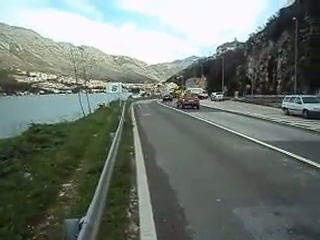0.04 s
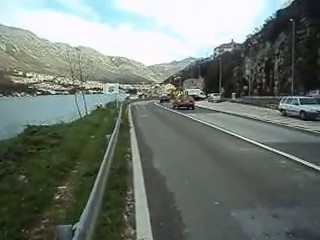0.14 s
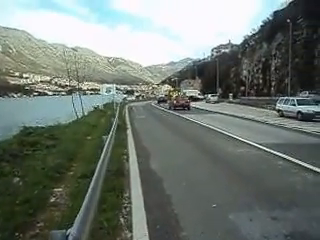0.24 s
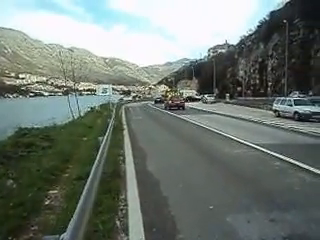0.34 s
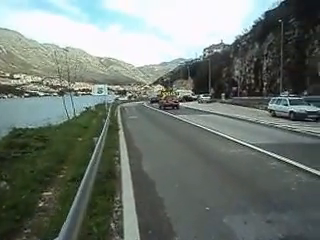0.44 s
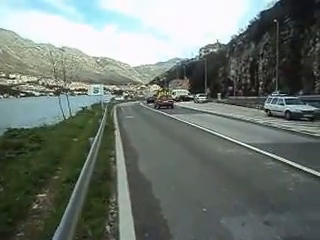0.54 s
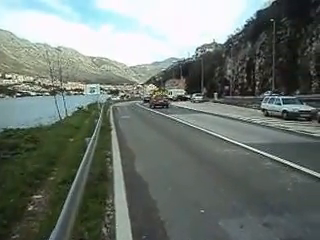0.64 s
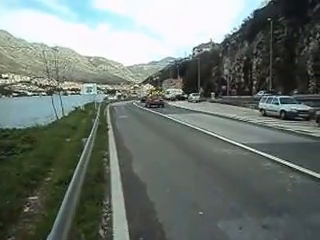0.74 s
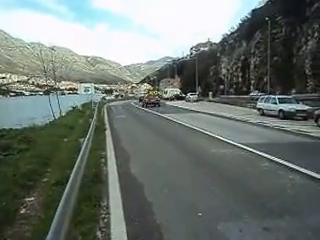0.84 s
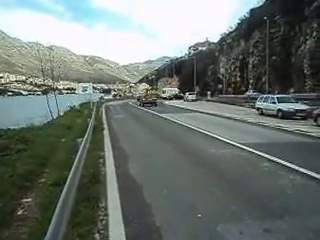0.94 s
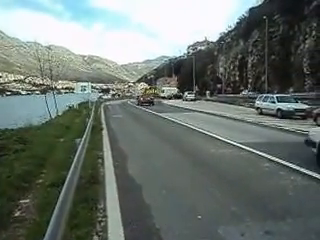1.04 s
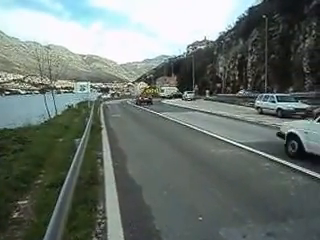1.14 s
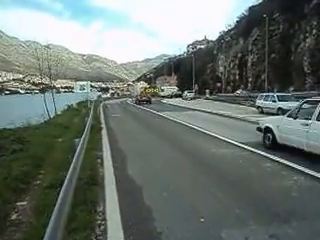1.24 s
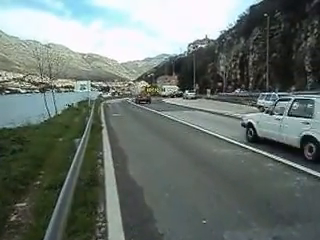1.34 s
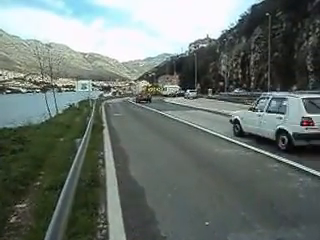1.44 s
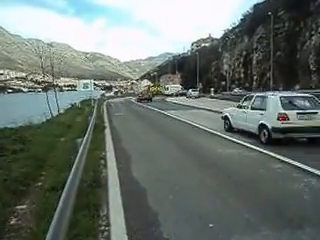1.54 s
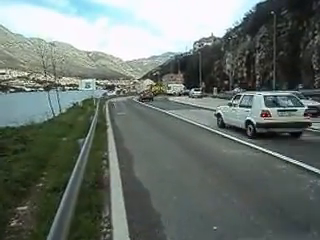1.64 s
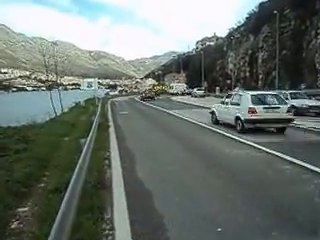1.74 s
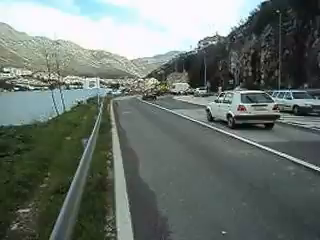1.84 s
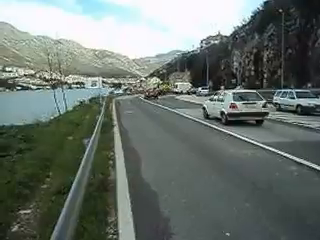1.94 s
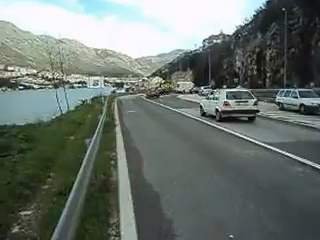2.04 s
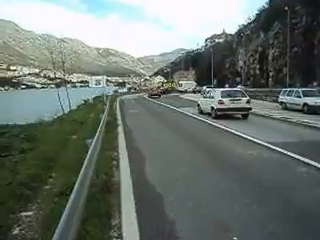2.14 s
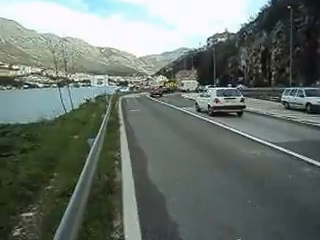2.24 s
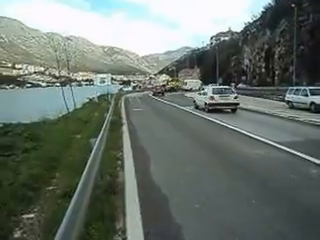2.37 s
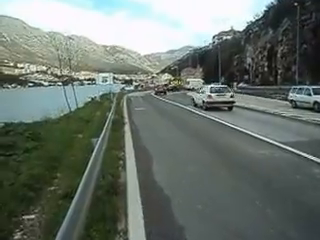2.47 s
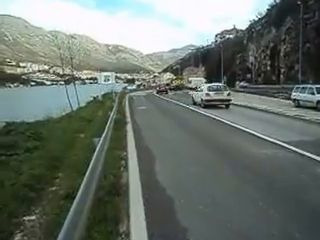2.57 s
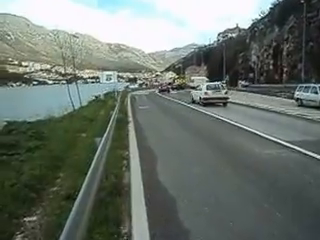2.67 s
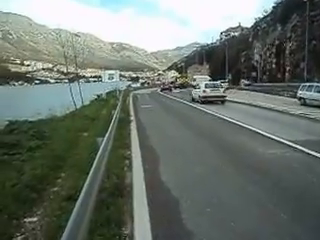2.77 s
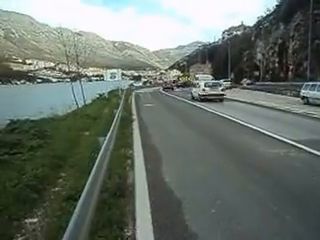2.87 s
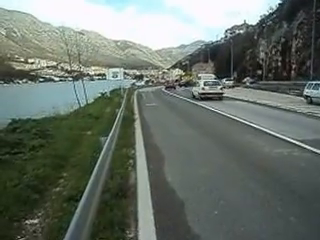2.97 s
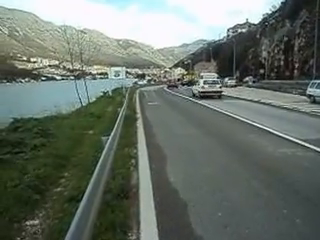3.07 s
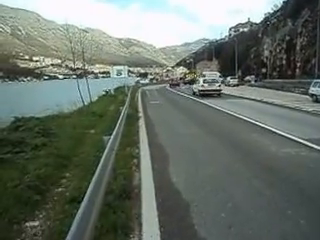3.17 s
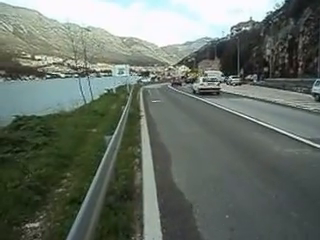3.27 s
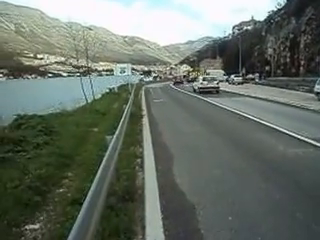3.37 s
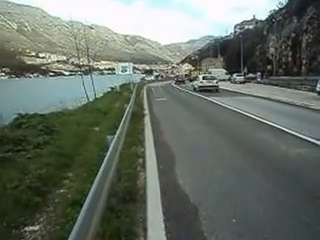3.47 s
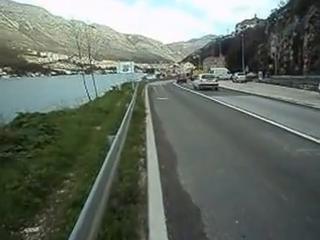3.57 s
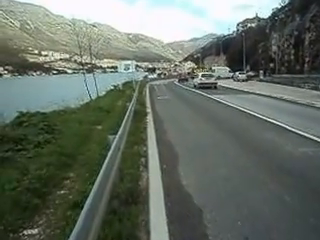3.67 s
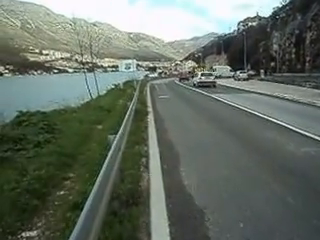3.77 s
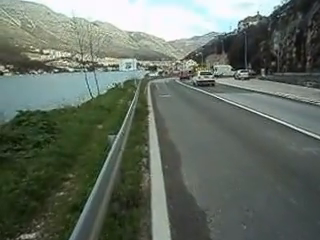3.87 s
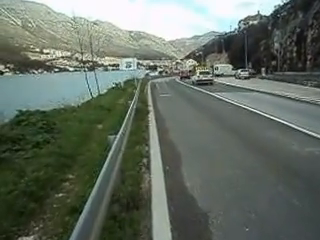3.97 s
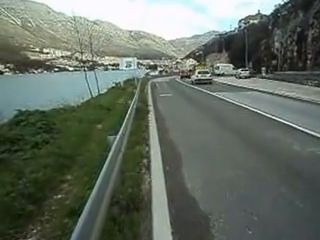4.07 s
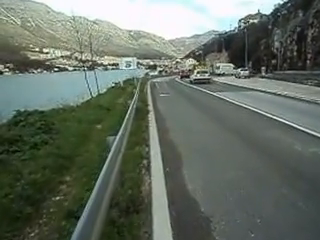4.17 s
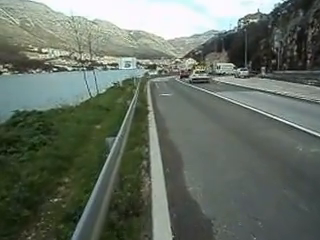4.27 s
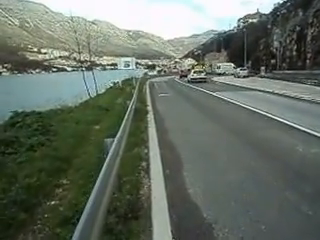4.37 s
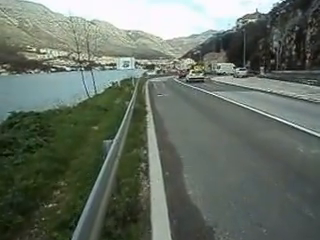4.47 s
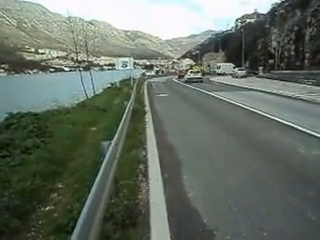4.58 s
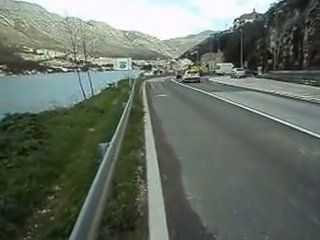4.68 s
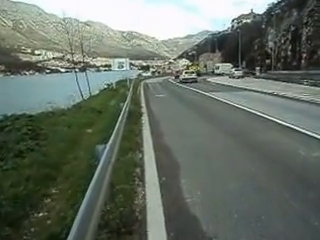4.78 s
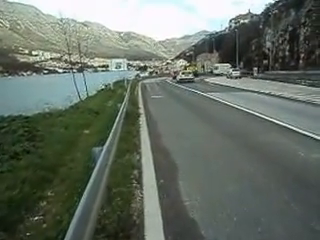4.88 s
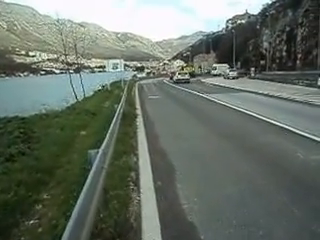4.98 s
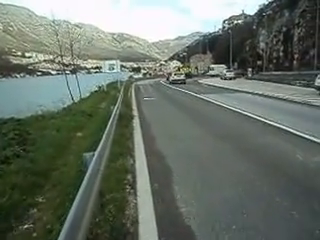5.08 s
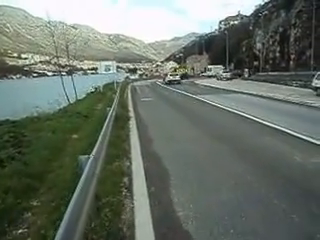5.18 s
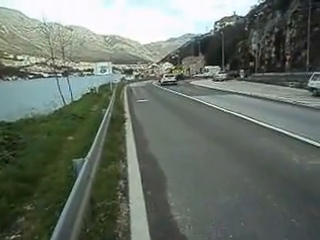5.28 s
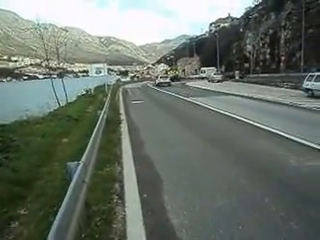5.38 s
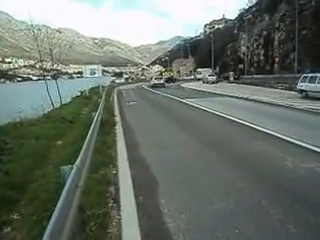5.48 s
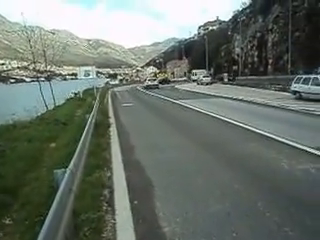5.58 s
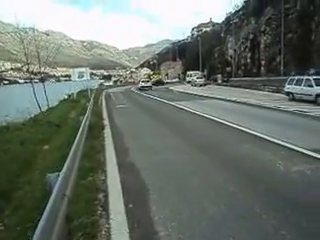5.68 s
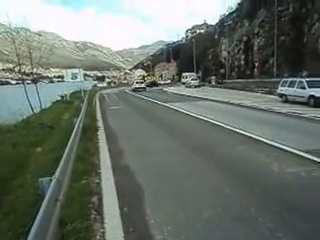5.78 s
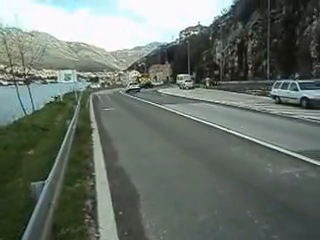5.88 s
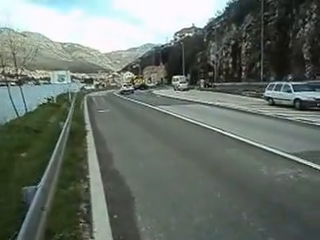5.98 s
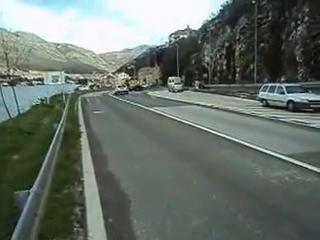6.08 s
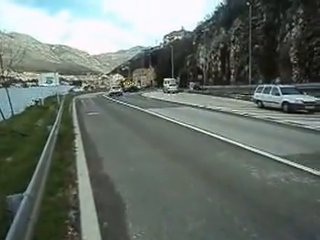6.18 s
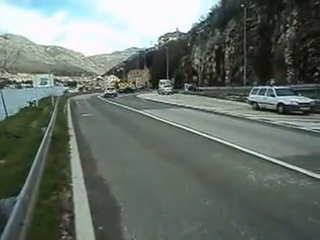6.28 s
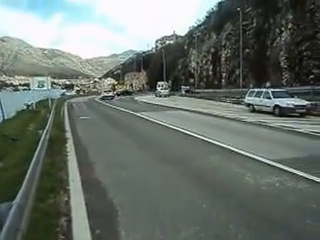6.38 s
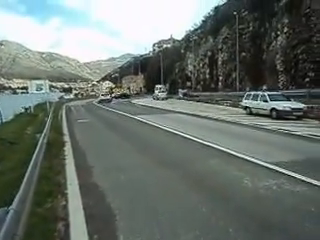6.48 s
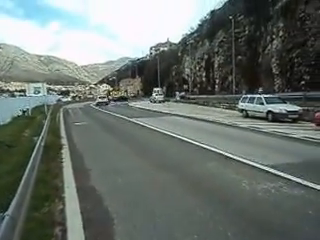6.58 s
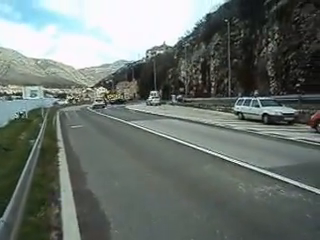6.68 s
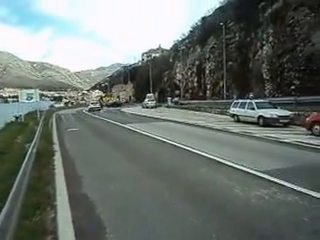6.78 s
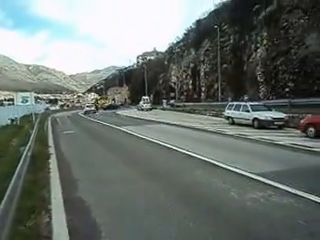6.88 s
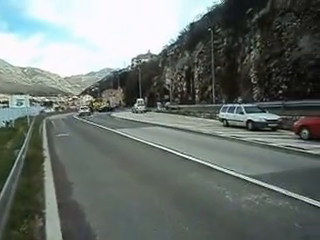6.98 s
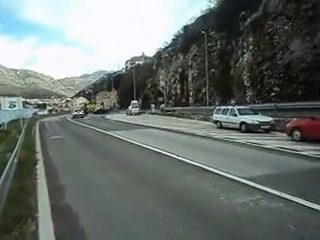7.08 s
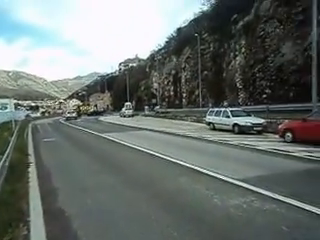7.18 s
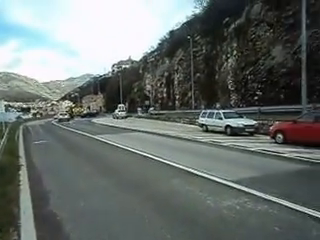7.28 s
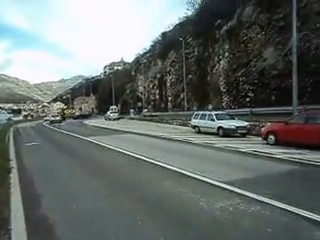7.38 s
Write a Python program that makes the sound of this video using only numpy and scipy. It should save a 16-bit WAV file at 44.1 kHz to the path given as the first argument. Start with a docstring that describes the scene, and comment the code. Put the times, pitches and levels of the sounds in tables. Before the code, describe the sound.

A steady wash of distant traffic and low, far engine tones runs throughout, heard from the verge of an open road. A small diesel car approaches at once and passes close at about 1 second, its tyres singing and roaring over a low exhaust boom. It then coasts away, its engine note sinking and its clatter fading, with a brief rise in ticking near 4 seconds. Very faint, thin brake squeals come between about 1.3 and 3 seconds. Small stones snap under tyres near 2, 3.3, 5, 5.7 and 7.4 seconds. From about 5 seconds another car accelerates, its exhaust note climbing steadily while rolling noise and hiss grow. Its engine tone eases slightly just after 7 seconds, near the end. The overall sound has a dull top end.

```python
"""Tyres sing and roar as a small diesel hatchback coasts close by, snapping grit, its brakes squealing thinly.
Its hiss bounces off the asphalt; exhaust boom, injector clatter and valve tick fade with distance.
Near 5 s another car picks up speed, its rising overtones swelling through the pipe's resonances.
Behind both, far engines drone over the steady wash of a coastal road. The top end is dull."""
import sys
import numpy as np
from scipy import signal
from scipy.fft import rfft, irfft, next_fast_len
from scipy.io import wavfile
from scipy.ndimage import uniform_filter1d, map_coordinates

SR = 44100
rng = np.random.default_rng(int(sys.argv[2]) if len(sys.argv) > 2 else 0)


def transcribe(signal):
    """Save signal, clipped to [-1, 1], as a 16-bit WAV file at the path in sys.argv[1]."""
    frames = np.atleast_2d(signal).T
    limited = np.clip(frames, -1, 1)
    pcm = np.round(limited * 32767).astype(np.int16)
    wavfile.write(sys.argv[1], SR, pcm)


N = 327222

# Levels in the tables are relative; each layer sets its own gain.
# colour of the distant traffic bed: f/Hz, level/dB
WASH_SPECTRUM = [(15, -20), (32, -1.5), (65, -7), (130, -5), (205, -7.5), (310, -17.5), (510, -8),
                 (720, -17.5), (1060, -14.5), (1800, -15), (2550, -34.5), (4050, -29), (5000, -41),
                 (6200, -53.5), (7200, -71)]
# far engines: start t/s, end t/s, first firing f/Hz, last firing f/Hz, level/dB, fade/(dB/s)
FAR_ENGINES = [(-.3, 4.9, 74.2, 92.4, -39, 1.6), (-.3, 7.8, 104, 106.3, -45, .6),
               (3.05, 5.05, 121.5, 146.5, -45, .8)]

# the accelerating car's firing rate: t/s, f/Hz
RISING_REVS = [(4.8, 47.6), (5.5, 62), (6.5, 82.3), (6.8, 88.6), (7.1, 93.2), (7.42, 96.9)]
# overtones of its exhaust pulse: multiple of the firing rate, level/dB
PULSE_OVERTONES = [(2, 0), (3, 0), (4, -7), (5, -3.5), (6, 1), (7, 0), (8, -7), (9, 2), (10, -4), (11, -1),
                   (12, -1), (13, 0)]
# pipe and body resonances that its overtones climb through: f/Hz, width/Hz, level/dB
PIPE_RESONANCES = [(124, 30, 5), (222, 26, 3), (254, 24, 1.5), (273, 12, 1), (334, 24, 3), (387, 30, 4),
                   (550, 40, -1.5), (618, 26, 1), (845, 50, -8), (970, 60, -11)]
# low resonances that its firing tone climbs through: f/Hz, width/Hz, level/dB
BOOM_RESONANCES = [(63, 17, -33.5), (97, 7, -26)]
# colour of its rolling noise: f/Hz, level/dB
ROLLING_SPECTRUM = [(120, -5.5), (400, -0.5), (600, -4.5), (900, 0.5), (1300, -6), (1800, -3.5),
                    (2300, -17.5), (3500, -34.5), (7000, -69)]
# colour of its intake hiss: f/Hz, level/dB
INTAKE_SPECTRUM = [(1500, -22), (2200, 1.5), (2600, 2), (3000, 5), (3400, -3), (4100, 0.5), (4800, -12),
                   (5500, -32), (6200, -27), (7200, -41.5)]

# stones snapping under tyres: t/s, level/dB
GRIT_SNAPS = [(2.0949, -28.5), (3.3209, -33), (4.92, -38), (5.708, -33.5), (7.3785, -33.5)]
# colour of a snap: f/Hz, level/dB
STONE_SPECTRUM = [(1500, -12), (2300, 1), (2900, 4), (3800, 1), (5000, -11), (7000, -32)]

# the coasting hatchback's firing rate: t/s, f/Hz
COASTING_REVS = [(0, 66.6), (1, 60.8), (1.5, 58.4), (2, 56.8), (3, 52), (3.5, 48), (4, 46), (4.5, 46),
                 (4.9, 49)]
# colour of its body rumble: f/Hz, level/dB
BODY_SPECTRUM = [(60, -25.5), (130, -10.5), (220, 1), (310, 1), (390, -3), (490, 0.5), (620, 1), (850, -3),
                 (1300, -14.5), (3000, -70), (7000, -95)]
# colour of its tyre roar: f/Hz, level/dB
TYRE_SPECTRUM = [(300, -32), (700, -3), (1050, 1), (1400, -0.5), (1800, 0), (2300, -8), (2700, -14.5),
                 (3300, -17), (5000, -33), (7000, -73.5)]
# colour of its singing tread: f/Hz, level/dB
TREAD_SPECTRUM = [(500, -54.5), (1300, -34.5), (1700, 0.5), (1880, -1.5), (2100, -10.5), (2700, -35.5),
                  (7000, -89.5)]
# the tread sings ahead of the tyres, then behind them: t/s, half-length/s, level/dB
TREAD_SWELLS = [(0.168, 0.28, -29), (1.246, .35, -34)]
# colour of its injector clatter: f/Hz, level/dB
INJECTOR_SPECTRUM = [(1500, -23), (2500, 5), (3200, -2.5), (4000, 6.5), (4500, 1), (5000, -11.5),
                     (5550, -26.5), (6100, -20), (6600, -27), (7200, -45)]
# colour of its valve gear: f/Hz, level/dB
VALVE_SPECTRUM = [(2500, -28), (3700, -10.5), (4300, 2), (4900, 3), (5500, -18), (6100, -10.5),
                  (6700, -20.5), (7200, -41.5)]
# partials of its exhaust drone: multiple of the firing rate, level/dB
DRONE_PARTIALS = [(2, -20), (3, -1), (4, -11.5)]
# silencer resonances that its third harmonic sinks through: f/Hz, width/Hz, level/dB
SILENCER_RESONANCES = [(194.1, 5.6, -28.5), (185.6, 7, -24.5), (178.9, 4.2, -29), (169.2, 8, -36.5)]
# its brake squeals: start t/s, length/s, f/Hz, level/dB
BRAKE_SQUEALS = [(1.31, .21, 5718, -69), (1.76, .44, 5685, -73), (2.2, .62, 5660, -73.5),
                 (2.82, .26, 5627, -72), (5.71, .14, 5567, -73.5)]

PASS_S = 0.82  # the hatchback is nearest
TIME = np.arange(N) / SR


def amp(db):
    """Decibels to gain."""
    return 10 ** (np.asarray(db) / 20)


def unit(x):
    """Scale to rms 1."""
    return x / np.sqrt(np.mean(x ** 2) + 1e-20)


def curve(points):
    """Straight ramps through (time, value) points."""
    return np.interp(TIME, *np.transpose(points))


def step(at, span):
    """A smooth fade from 0 to 1, centred on a time and span seconds long."""
    return .5 + .5 * np.sin(np.pi * np.clip((TIME - at) / span, -.5, .5))


def swell(at, span):
    """A bell-shaped swell of height 1."""
    return np.exp(-((TIME - at) / span) ** 2)


def wobble(rate):
    """A smooth random curve, rate knots a second."""
    return map_coordinates(rng.standard_normal(int(N * rate / SR) + 4), [TIME * rate])


def resonance(hz, peaks):
    """Gain of a bank of resonant peaks at a frequency."""
    return sum(amp(db) / (1 + ((hz - centre) / (width / 2)) ** 2) for centre, width, db in peaks)


def filtered(x, response):
    """EQ x by a gain that depends on frequency."""
    size = next_fast_len(N + 8192)
    return irfft(rfft(x, size) * response(np.fft.rfftfreq(size, 1 / SR)), size)[:N]


def coloured(x, spectrum):
    """EQ x through spectrum points on a log frequency axis, at rms 1."""
    f, db = np.transpose(spectrum)
    return unit(filtered(x, lambda hz: amp(np.interp(np.log(hz + 1), np.log(f), db))))


def rush(spectrum, patchy_db):
    """Coloured noise of rms 1 with drifting patches of random gain."""
    bands = signal.stft(rng.standard_normal(N), nperseg=1024)[2]
    patches = uniform_filter1d(rng.standard_normal(bands.shape), size=5, axis=0)
    patches = unit(uniform_filter1d(patches, size=14, axis=1))
    noise = signal.istft(bands * amp(patchy_db * patches), nperseg=1024)[1][:N]
    return coloured(noise, spectrum)


def count_cycles(hz, waver):
    """Cycles so far at a slightly unsteady rate."""
    return np.cumsum(hz * (1 + waver * wobble(9))) / SR


def tone(cycles, shimmer_db):
    """A sine of rms near 1 on a cycle count, with a shimmering level."""
    return np.sqrt(2) * np.sin(2 * np.pi * (cycles + rng.random())) * amp(shimmer_db * wobble(6.4))


def road_wash():
    """The bed: a steady wash of distant traffic along the shore."""
    return amp(-37.5 + 0.29 * wobble(1)) * rush(WASH_SPECTRUM, patchy_db=0.96)


def far_engines(trim_db=-1.5):
    """From afar only each engine's firing tone carries; its pitch creeps up as the car draws away."""
    out = np.zeros(N)
    for start, end, first_hz, last_hz, db, fade in FAR_ENGINES:
        gate = step(start, span=0.22) * (1 - step(end, span=.25))
        level = amp(trim_db + db - fade * (TIME - start))
        hz = curve([(start, first_hz), (end, last_hz)])
        out += gate * level * tone(count_cycles(hz, waver=0.0066), shimmer_db=3.5)
    return out


def climbing_overtones(hz, fired, octaves, leak_db=-7.5):
    """Each overtone swells as it crosses a pipe resonance; uneven firings flutter the high ones most."""
    tilt_db = 10.5 * np.minimum(octaves, 0)  # per octave of overtone: darker at low revs
    out = np.zeros(N)
    for k, db in PULSE_OVERTONES:
        flutter_db = 0.3 * k * wobble(45)
        strength = amp(db + tilt_db * np.log2(k / 2) + flutter_db)
        pipe = amp(leak_db) + resonance(k * hz, PIPE_RESONANCES)
        out += strength * pipe * tone(k * fired, shimmer_db=1.4)
    return out


def accelerating_car(cruise_hz=85):
    """The throttle opens: the exhaust note climbs, and rolling noise and intake hiss grow with the revs."""
    hz = curve(RISING_REVS)
    octaves = np.log2(hz / cruise_hz)
    fired = count_cycles(hz, waver=0.00314)
    throttle, eased = step(4.94, span=0.76), step(7.12, span=0.16)
    overtones = amp(-47.5 + 1.5 * octaves - 3.5 * eased) * climbing_overtones(hz, fired, octaves)
    growl = 1 + 0.16 * np.cos(2 * np.pi * fired)  # the noise swells with each firing
    rolling = amp(-40 + octaves) * rush(ROLLING_SPECTRUM, patchy_db=1.0)
    intake = amp(-50 + 16.5 * octaves) * rush(INTAKE_SPECTRUM, patchy_db=1.1)
    boom = resonance(hz, BOOM_RESONANCES) * tone(fired, shimmer_db=.5)
    return throttle * (boom + overtones + growl * (rolling + intake))


def grit(decay_s=0.0083):
    """Small stones snap from under the tyres in short, bright bursts."""
    envelope = sum(amp(db) * (TIME >= at) * np.exp(-np.abs(TIME - at) / decay_s) for at, db in GRIT_SNAPS)
    snaps = envelope * rng.standard_normal(N)
    return amp(-6) * np.std(snaps) * coloured(snaps, STONE_SPECTRUM)


def hatchback_path(lane_m=6.5, pass_m_per_s=6.89, braking_m_per_s2=0.34):
    """The braking car's distance in doublings of the nearest, and bearing (-1 coming, 1 going)."""
    t = TIME - PASS_S
    along_m = pass_m_per_s * t - braking_m_per_s2 * t ** 2 / 2
    distance_m = np.hypot(along_m, lane_m)
    return np.log2(distance_m / lane_m), along_m / distance_m


def asphalt_bounce(x, bearing, strength=0.19):
    """Add the road's late reflection: a comb that slides down as the car goes by."""
    lag_ms = 0.47 + 0.11 * bearing
    return x + strength * map_coordinates(x, [np.arange(N) - lag_ms * SR / 1000], order=1)


def brakes(sag_hz_per_s=52, edge_s=.08, low_rate_hz=11025):
    """Thin, stuttering brake squeals sag in pitch; a low sample rate adds a rising alias below each."""
    out = np.zeros(N)
    for start, length, hz, db in BRAKE_SQUEALS:
        cycles = count_cycles(hz - sag_hz_per_s * (TIME - start), waver=.002)
        alias = low_rate_hz * TIME - cycles
        held = step(start, edge_s) * (1 - step(start + length, edge_s))
        out += amp(db) * held * (np.sin(2 * np.pi * cycles) + np.sin(2 * np.pi * alias))
    return amp(5 * wobble(60)) * out


def valve_gear(fired, rustle=.24):
    """The valve gear rustles, and one loose valve ticks every four firings."""
    cycles = (fired - 3 / 4) / 4
    tick, since = np.floor(cycles).astype(int), cycles % 1
    strength = amp(2.6 * rng.standard_normal(256))[tick]
    ticks = strength * (1 - np.exp(-since / .05)) * np.exp(-since / .13)
    return coloured((rustle + ticks) * rng.standard_normal(N), VALVE_SPECTRUM)


def injectors(fired, hiss=.42):
    """Each injection rattles the engine block; one cylinder of the four knocks hardest."""
    cycles = fired + 1 / 4  # each knock starts a quarter cycle early, so it peaks near the count
    knock, since = np.floor(cycles).astype(int), cycles % 1
    knock_db = np.array([-10, 0, -9, -7])[knock % 4] + 1.5 * rng.standard_normal(1024)[knock]
    strikes = amp(knock_db) * (1 - np.exp(-since / .08)) * np.exp(-since / .55)
    return coloured((hiss + strikes) * rng.standard_normal(N), INJECTOR_SPECTRUM)


def exhaust(hz, fired, doublings, idle_db=-35.5, front_share=0.22):
    """The coasting car's pipe booms at the firing rate and drones around its third harmonic."""
    tailpipe_in_view, throttle_shut = step(.5, span=0.52), step(2.22, span=0.27)
    driven_db = -25.8 + 0.94 * (hz - hz[int(PASS_S * SR)])  # louder at higher revs
    boom_db = driven_db * (1 - throttle_shut) + idle_db * throttle_shut
    facing = tailpipe_in_view - front_share * (1 - tailpipe_in_view)  # the front is in opposite phase
    throb = tone(fired, shimmer_db=0) + amp(-15.5) * tone(2 * fired, shimmer_db=2.5)
    partials = sum(amp(db) * tone(k * fired, shimmer_db=.5) for k, db in DRONE_PARTIALS)
    # four unequal cylinders add weak partials at quarter multiples of the firing rate
    uneven = sum(tone(k / 4 * fired, shimmer_db=3) for k in (11, 13, 14, 15))
    boom = amp(boom_db) * facing * throb
    drone = resonance(3 * hz, SILENCER_RESONANCES) * (partials + amp(-17.5) * uneven)
    fade_out = 1 - step(6.4, span=.3)
    return (boom + drone) / 2 ** doublings * fade_out


def tyres(doublings, bearing):
    """The tyres roar loudest as they pass; the tread sings just before and just after."""
    roar = amp(-26 - 9.5 * doublings - .5 * bearing) * rush(TYRE_SPECTRUM, patchy_db=0.7)
    singing = sum(amp(db) * swell(at, span) for at, span, db in TREAD_SWELLS)
    return roar + singing * rush(TREAD_SPECTRUM, patchy_db=1.0)


def hatchback():
    """The close pass: body, tyres, engine and exhaust fall away with distance while the brakes squeal."""
    hz = curve(COASTING_REVS)
    fired = np.cumsum(hz) / SR
    doublings, bearing = hatchback_path()
    shaded = 1 - step(0.32, span=0.57)  # the engine's treble is muted until the car draws level
    rattle = swell(3.83, span=0.35)  # it rattles harder as it sinks to idle
    clatter_db = -40.5 - 11 * doublings + 4 * bearing + 2 * rattle - 9.5 * shaded
    valve_db = -47.5 - 16.5 * doublings + 11 * rattle - 15 * shaded
    body = amp(-28.5 - 8.5 * doublings) * rush(BODY_SPECTRUM, patchy_db=0)
    hiss = tyres(doublings, bearing) + amp(clatter_db) * injectors(fired)
    pipe = exhaust(hz, fired, doublings)
    valves = amp(valve_db) * valve_gear(fired)
    return pipe + body + valves + brakes() + asphalt_bounce(hiss, bearing)


def scene():
    """The mono mix, heard from the verge."""
    return (hatchback() + accelerating_car() + far_engines() + grit() + road_wash())[None]


def record(dry, top_hz=7100):
    """A steep high cut takes the air off the mix."""
    return filtered(dry[0], lambda hz: 1 / (1 + (hz / top_hz) ** 80))[None]


dry = scene()
out = record(dry)
transcribe(out)
```